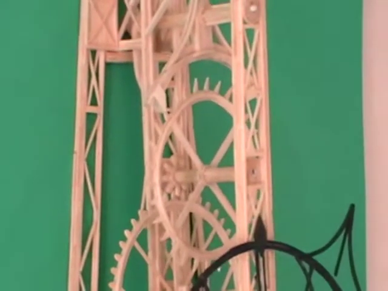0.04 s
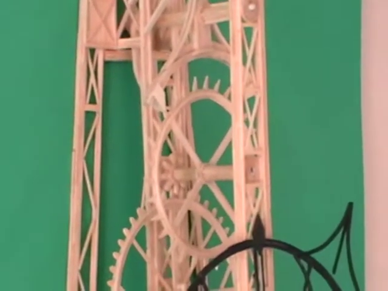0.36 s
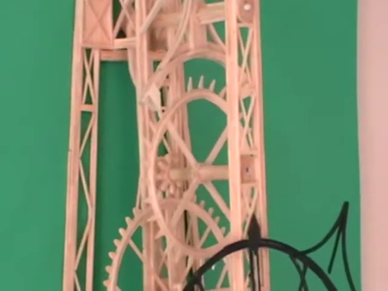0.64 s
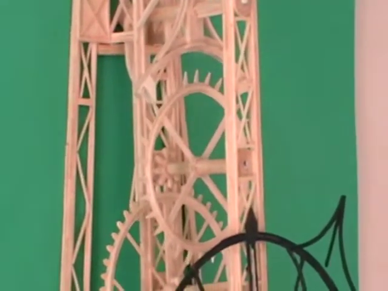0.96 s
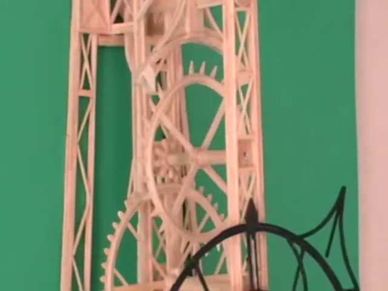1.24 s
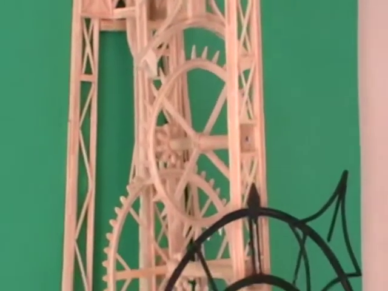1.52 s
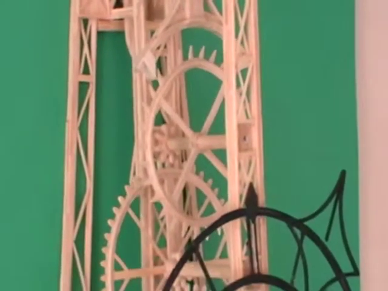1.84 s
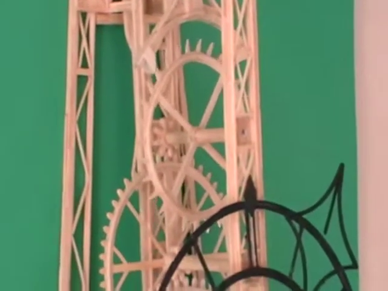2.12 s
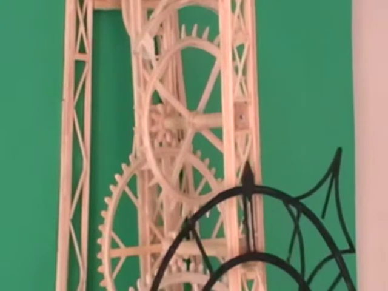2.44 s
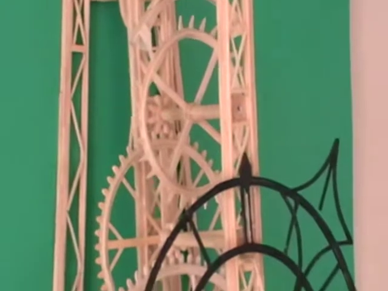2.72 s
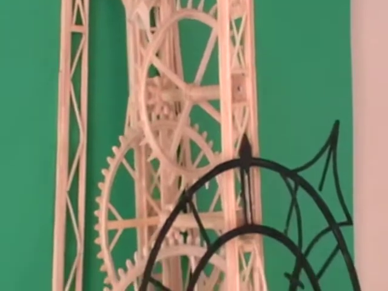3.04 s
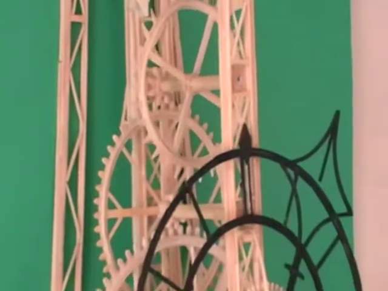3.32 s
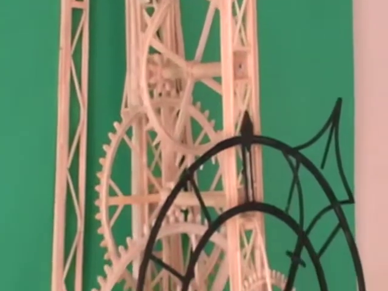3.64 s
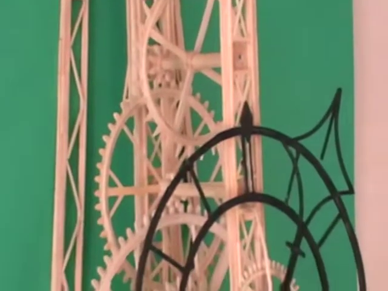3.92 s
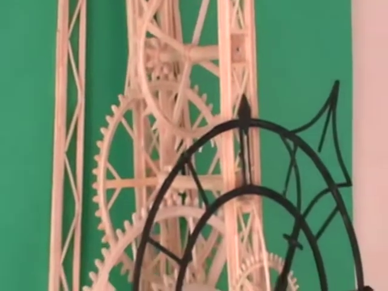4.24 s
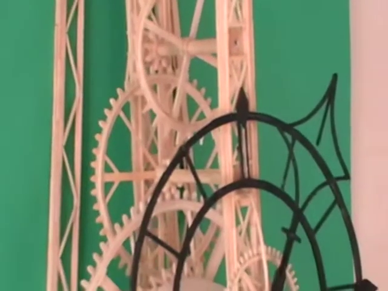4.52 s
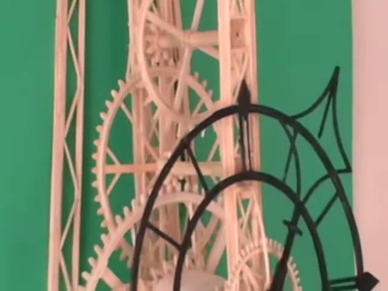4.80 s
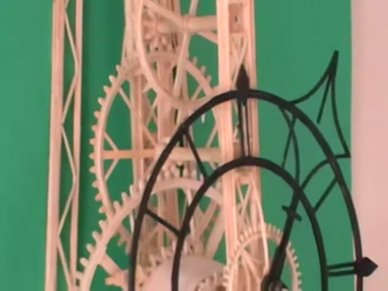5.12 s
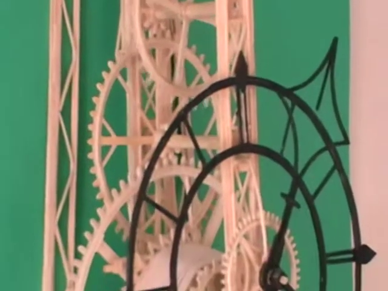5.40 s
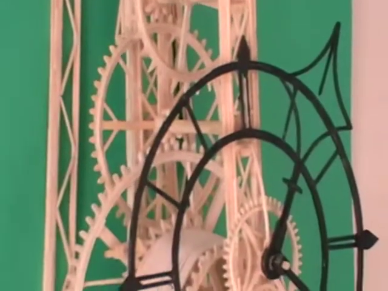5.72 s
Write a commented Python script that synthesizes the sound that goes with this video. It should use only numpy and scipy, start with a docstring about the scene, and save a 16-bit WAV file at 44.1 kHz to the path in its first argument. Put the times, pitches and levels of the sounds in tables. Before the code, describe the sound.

A wooden clock mechanism clicks about once a second among irregular gear ticks, then briefly clatters and thuds.

```python
"""The gear train of a tall wooden clock turns in fits and starts in a small, quiet room.
Teeth tick, drag and rub on each other while the escapement beats about once a second.
A slipping wheel shakes the frame and a catch snaps once. Near the end loose parts clatter
against the frame and a hollow part thuds. Each contact is a tiny impact and a chatter of
wood grain that ring the wheel and, briefly, the room, over soft air and a faint hum."""
import sys
import numpy as np
from scipy import signal
from scipy.fft import rfft, irfft, next_fast_len
from scipy.io import wavfile

SR = 44100
rng = np.random.default_rng(int(sys.argv[2]) if len(sys.argv) > 2 else 0)


def digitize_waveform(pressure):
    """Quantize a signal to 16-bit integers and store it at the path in sys.argv[1].

    Rows of a 2-D input are taken as channels; values are limited to [-1, 1].
    """
    field = np.atleast_2d(pressure).T
    bounded = np.clip(field, -1, 1)
    quanta = np.round(bounded * 32767).astype(np.int16)
    wavfile.write(sys.argv[1], SR, quanta)


N = 258426
WHEEL_HZ = 2690   # where a wheel rings when a tooth seats or falls back

# Teeth that meet cleanly. Each row: start in seconds, level in dB, resonance in Hz,
# hardness in dB per octave of treble, weight in dB per octave of bass.
TOOTH_TICKS = [(0.0455, -5, 1530, 0, -0.5), (0.2901, -18, 1750, -2.5, 3.5), (0.86, -16.5, 1740, -3.5, 1.5),
               (1.4907, -23, 1760, -7.5, -4), (2.8149, -12.5, 4500, 3.5, 4), (2.9481, -9.5, 2200, 0, -0.5),
               (3.014, -9, 3730, 0.5, -3), (3.0928, -19.5, 4130, 1.8, -1.5), (3.1632, -21.5, 2050, -3, 2),
               (4.0855, -21, 2700, -6, -3)]
# Teeth that drag before they seat. Each row: start in seconds, level in dB, resonance in Hz,
# slide time in seconds, hardness in dB per octave of treble.
TOOTH_DRAGS = [(0.1905, -12.5, 1600, 0.031, -0.5), (0.386, -11, 1330, 0.017, 0.9),
               (0.519, -18, 1370, 0.026, -2.5), (0.7764, -27, 1370, 0.022, -0.5),
               (0.8873, -14, 1570, 0.012, 1), (1.023, -21.5, 2160, 0.0073, -2.5),
               (1.2599, -21.5, 1660, 0.026, 2.5), (1.3644, -20.5, 1750, 0.02, 1),
               (1.9156, -18.5, 1700, 0.01, 7), (1.9448, -13.5, 715, 0.021, -5),
               (2.139, -26.5, 1560, 0.038, 1), (2.2814, -34, 2500, 0.0089, 2.5),
               (3.4749, -17.5, 2880, 0.0067, -8.5), (3.512, -15.5, 1180, 0.02, -20),
               (3.5234, -5, 2660, 0.014, 0.3), (4.0036, -27, 1360, 0.005, -0.5),
               (4.2085, -18, 2980, 0.0067, -0.3), (4.7366, -18, 870, 0.0093, -2)]


def ticks(chatter_s=0.0028, halving_db=6):
    """Teeth meet with a sharp first impact; the harder the contact, the shorter its chatter."""
    # The tone of a tick. Each row: frequency in Hz, gain in dB.
    tone = [(270, -3.5), (870, -3.5), (1600, 1), (2450, -2.5), (4700, -3), (6800, -7.5), (13500, -15)]
    touches = [(s, db, hz, chatter_s * 2 ** (-hardness / halving_db), hardness, weight)
               for s, db, hz, hardness, weight in TOOTH_TICKS]
    return from_db(7) * strike(touches, tone, lift_db=7.5, q=10, impact_db=-6.5,
                               wheel_s=0.01, room_db=0, rise_share=0.48, ripple_db=4.5)


def drags(seat_after_s=0.02, seat_db=-10.5, seat_chatter_s=0.012):
    """Teeth slide over each other, then seat with a weaker touch that rings the wheel."""
    # The tone of a drag. Each row: frequency in Hz, gain in dB.
    tone = [(270, -2), (870, -4.5), (1600, 1.5), (2450, -0.7), (4500, -5.5), (6800, -10.5), (13500, -21.5)]
    slides = [(*drag, 0) for drag in TOOTH_DRAGS]
    seats = [(s + seat_after_s, db + seat_db, WHEEL_HZ, seat_chatter_s, hardness, 0)
             for s, db, _, _, hardness in TOOTH_DRAGS]
    return from_db(8) * strike(slides + seats, tone, lift_db=9.5, q=6, impact_db=-13,
                               wheel_s=0.011, room_db=-2, rise_share=0.14, ripple_db=2)


def escapement(rebound_s=0.029, rebound_db=-26):
    """Two pallets catch the escape wheel in turn; after each crisp beat it falls back softly."""
    # The start of each beat in seconds.
    beat_times = [0.0202, 1.1548, 2.1922, 3.3228, 4.3465, 5.4603]
    # Tick and tock. Each row: level in dB, resonance in Hz, chatter in seconds,
    # hardness and weight in dB per octave.
    pallets = [(-16.5, 2540, 0.0016, 0.2, -0.5), (-11, 2400, 0.0031, -0.3, 1.5)]
    # The tone of a beat. Each row: frequency in Hz, gain in dB.
    tone = [(270, -11.5), (950, -0.5), (1600, 3), (2450, -1.5), (6800, -9.5), (10000, -6.5), (13500, -5.5)]
    beats = [(s, *pallets[k % 2]) for k, s in enumerate(beat_times)]
    rebounds = [(s + rebound_s, rebound_db, WHEEL_HZ, 0.003, -2, 1.5) for s in beat_times]
    return from_db(7) * strike(beats + rebounds, tone, lift_db=8.5, q=9.3, impact_db=-5.5,
                               wheel_s=0.013, room_db=-1, rise_share=0.69, ripple_db=2)


def catch(chatter_s=0.0031):
    """The catch snaps in, rebounds and rings brightly."""
    # The snap. Each row: start in seconds, level in dB, resonance in Hz.
    snaps = [(3.727, -1, 3280)]
    # Its tone. Each row: frequency in Hz, gain in dB.
    tone = [(270, -10.5), (870, -9), (1500, -7.5), (2450, 2.5), (4700, -4), (6800, -9.5), (13500, -4.5)]
    # Resonances of the catch. Each row: centre in Hz, width in Hz, gain in dB.
    resonances = [(3300, 220, 5.5), (4630, 640, 5.5), (9160, 1050, 12.5)]
    touches = double_touch(snaps, chatter_s, gap_s=0.0125, change_db=-7)
    snap = strike(touches, tone, lift_db=4.5, q=8, impact_db=-21,
                  wheel_s=0.0096, room_db=-3, rise_share=0.18, ripple_db=5.5)
    return from_db(6.5) * shape(snap, resonances)


def clatter(chatter_s=0.0058, rattle_start_s=4.9414, rattle_gap_s=0.031, rattle_hz=1160):
    """Loose parts knock on the frame, then rattle in three softer, nearly equal bounces."""
    # The knocks. Each row: start in seconds, level in dB, resonance in Hz, weight in dB per octave.
    knocks = [(4.8126, 3.5, 1190, -1), (4.8288, 0.7, 925, 2.5), (4.8378, -1.5, 1030, 3.5),
              (4.8652, 2, 1030, -1.1), (4.8744, -2.5, 1340, 2.8)]
    # Their tone. Each row: frequency in Hz, gain in dB.
    tone = [(270, 3.5), (950, 5), (1700, 1), (2450, -1.5), (4700, -2), (6800, -7.5), (13500, -9.5)]
    blows = [(s, db, hz, chatter_s, 0, weight) for s, db, hz, weight in knocks]
    bounces = [(rattle_start_s + k * rattle_gap_s, -12 + 0.26 * k, rattle_hz, 0.012, -2, -1)
               for k in range(3)]
    return from_db(6.5) * strike(blows + bounces, tone, lift_db=8, q=5.6, impact_db=-22,
                                 wheel_s=0.0069, room_db=-1, rise_share=0.25, ripple_db=2)


def thud(chatter_s=0.0064):
    """A quick double blow lands on a hollow part of the frame."""
    # The blow. Each row: start in seconds, level in dB, resonance in Hz.
    thuds = [(5.1768, -3.5, 880)]
    # Its tone. Each row: frequency in Hz, gain in dB.
    tone = [(270, 9.5), (870, 2), (1400, 3), (2450, 1), (6800, -3), (13500, -11.5)]
    # Peaks and dips of the hollow part. Each row: centre in Hz, width in Hz, gain in dB.
    hollow = [(328, 40, 4), (565, 69, 7.5), (682, 110, -19), (835, 120, 9.5), (1130, 250, -4.5),
              (1730, 280, 2), (2034, 300, -17)]
    touches = double_touch(thuds, chatter_s, gap_s=0.008, change_db=1)
    blow = strike(touches, tone, lift_db=8.5, q=6.5, impact_db=-23,
                  wheel_s=0.0068, room_db=0, rise_share=0.14, ripple_db=0.5)
    return from_db(6.5) * shape(blow, hollow)


def shudder(slip_start_s=1.93, slip_gap_s=0.0172, slip_db=-33, edge_db=-6.5, room_db=-10):
    """A wheel sticking and slipping, and later three jolts, kick the frame's low bending modes."""
    # The jolts. Each row: start in seconds, level in dB.
    jolts = [(4.889, -28.5), (5.177, -43), (5.463, -45)]
    # Well damped bending modes. Each row: frequency in Hz, level in dB, t60 in seconds.
    bending = [(200, -13, 0.079), (248, 7, 0.067), (298, -8, 0.046), (490, -5, 0.084)]
    slips = [(slip_start_s + k * slip_gap_s, slip_db + edge_db * place ** 2)
             for k, place in enumerate(np.linspace(-1, 1, 5))]   # loudest in the middle
    kicks = np.zeros(N)
    for s, db in slips + jolts:
        kicks[round(s * SR)] = from_db(db)
    swing = signal.fftconvolve(kicks, ring(bending, SR // 4))[:N]
    return swing + from_db(room_db) * signal.fftconvolve(swing, room_tail(build_s=0.003)[0])[:N]


def rubbing(grains_per_s=1600, level_db=-57.5, fade_s=0.079, follow=0.76):
    """Wood fibres catch and let go as the wheels turn for a moment around each tooth contact."""
    # The tone of the rubbing. Each row: frequency in Hz, gain in dB.
    tone = [(300, -36), (900, 8), (2200, 0.5), (4500, 2.5), (9000, -7.5), (14000, -53)]
    t = np.arange(N) / SR
    power = sum(from_db(follow * db) ** 2 * np.exp(-np.abs(t - s) / fade_s)
                for s, db, *_ in TOOTH_TICKS + TOOTH_DRAGS)
    return from_db(level_db) * np.sqrt(power * N) * unit(colour(grains(N, grains_per_s), tone))


def double_touch(blows, chatter_s, gap_s, change_db):
    """Each blow lands twice on the same part."""
    return [(s + k * gap_s, db + k * change_db, hz, chatter_s, 0, 0)
            for s, db, hz in blows for k in (0, 1)]


def strike(touches, tone, lift_db, q, ripple_db, pivot_hz=2500, **contact_settings):
    """Wood touches wood, each time with its own tilt and resonances; gives mid and side."""
    track = np.zeros((2, N))
    knots = np.geomspace(tone[0][0], tone[-1][0], 48)
    octaves = np.log2(knots / pivot_hz)
    for s, db, ring_hz, chatter_s, hardness, weight in touches:
        tilt = np.where(octaves > 0, hardness, -weight) * octaves
        # the place of contact favours some modes of the wheel and misses others
        ripple = ripple_db * np.diff(rng.standard_normal(len(knots) + 1)) / np.sqrt(2)
        curve = np.c_[knots, at_hz(tone, knots) + tilt + ripple]
        hit = colour(contact(chatter_s, **contact_settings), curve)
        hit = shape(hit, [(ring_hz, ring_hz / q, lift_db)])
        start = round(s * SR)
        track[:, start:start + hit.shape[1]] += from_db(db) * hit[:, :N - start]
    return track


def contact(chatter_s, impact_db, wheel_s, room_db, rise_share):
    """One touch as mid and side: first impact, chatter of the grain, dense wheel ring, room."""
    tail = room_tail(build_s=chatter_s + 0.0027)
    t = np.arange(tail.shape[1]) / SR
    rise = 1 - np.exp(-(t + 1 / SR) / (rise_share * chatter_s))
    chatter = unit(grains(len(t), per_s=2500) * rise * np.exp(-t / chatter_s))
    wheel_envelope = unit(rise * np.exp(-(t / (wheel_s + chatter_s)) ** 2))
    wheel = rng.standard_normal(tail.shape) * wheel_envelope
    wheel = colour(wheel, [(5000, 0), (9000, 2.5), (14000, -9)])   # wood damps the top treble
    sound = 0.8 * wheel + from_db(room_db) * tail
    sound[0] += disperse(from_db(impact_db) * (t == 0) + 0.46 * chatter)
    return sound / np.sqrt(np.sum(sound[0] ** 2))


def disperse(x, delay_s=0.000569, reference_hz=3000):
    """Bending waves in wood carry the treble faster than the bass, which smears a sharp impact."""
    phase = 4 * np.pi * delay_s * np.sqrt(reference_hz * bins(len(x)))
    return irfft(rfft(x) * np.exp(-1j * phase), len(x))


def frame(blows, ring_db=-18):
    """The struck frame colours each blow and rings on with its own modes."""
    # Broad peaks and dips of the frame. Each row: centre in Hz, width in Hz, gain in dB.
    body = [(304, 51, 2.5), (465, 84, -2.5), (907, 330, -7.5), (2660, 590, 4.5)]
    # Its ringing modes. Each row: frequency in Hz, level in dB, t60 in seconds.
    modes = [(156.2, 7.5, 0.72), (234, 4, 0.66), (453, -9, 0.95), (610, -9, 0.79), (658, 11, 0.25),
             (690, -8, 0.32), (790, -6, 0.083), (982, -1, 0.15), (1100, -2, 0.37), (1220, -16, 0.16),
             (1670, -12, 0.36), (1750, 16, 0.1), (2160, -8, 0.64), (2680, 5.5, 0.37), (2850, 0, 0.29)]
    return resonate(shape(blows, body), ring(modes, SR // 2), ring_db)


def lattice(x, t60_s=0.05, ring_db=-6):
    """The many close modes of the lattice of struts add a short, dense ring."""
    t = np.arange(SR // 4) / SR
    response = rng.standard_normal(len(t)) * np.exp(-np.log(1000) * t / t60_s)
    return resonate(x, response, ring_db)


def radiate(mid_side):
    """Thin wooden parts radiate little bass; the stereo image is narrow except in the top treble."""
    # How the wood radiates. Each row: frequency in Hz, gain in dB.
    wood = [(60, -41), (120, -15.5), (170, -8.5), (230, -5.5), (450, -4.5), (700, -1), (1100, 0.5),
            (1800, -1.5), (2900, 0), (4500, 1), (6500, 0), (9300, -3), (11500, -10), (16000, -21)]
    # Width of the contacts. Each row: frequency in Hz, side against mid in dB.
    width = [(120, -38), (500, -17), (4000, -13.5), (9000, -19.5), (13000, 2.5)]
    return stereo(colour(mid_side, wood), width)


def room_tail(build_s, size=20480, bands=7):
    """Dense reflections, new for each place of contact, build up and die band by band."""
    # The room's decay. Each row: frequency in Hz, t60 in seconds.
    decay = [(200, 1), (450, 0.074), (1000, 0.36), (3000, 0.24), (7000, 0.24), (14000, 0.16)]
    t, tail = np.arange(size) / SR, 0
    spectrum = rfft(rng.standard_normal((2, size)))
    centres = np.geomspace(200, 13000, bands)
    for hz, weights in zip(centres, np.eye(bands)):
        band = irfft(spectrum * at_hz(np.c_[centres, weights], bins(size)))
        envelope = unit(np.exp(-np.log(1000) * t / at_hz(decay, hz)) * (1 - np.exp(-t / build_s)))
        tail += from_db(-2 * hz / 8000) * band * envelope   # the walls swallow some treble
    return tail


def room_tone(air_db=-55.6):
    """Soft, wide air noise lies under a slightly wavering hum."""
    # The tone of the air. Each row: frequency in Hz, gain in dB.
    air_tone = [(15, -63), (25, -51), (50, -17.5), (87, -13.5), (157, -8), (236, -11.5), (405, -11.5),
                (451, -9.5), (754, -17.5), (962, -22.5), (1040, -20), (1330, -21.5), (1790, -27),
                (16000, -44.5)]
    # Its width. Each row: frequency in Hz, side against mid in dB.
    air_width = [(30, -2), (120, -13), (500, -8), (2000, 0.5), (6000, -3.5), (14000, -6)]
    # The hum. Each row: frequency in Hz, rms level in dB.
    hum_tones = [(100, -64), (162, -61.5), (299, -66.5)]
    noise = stereo(rng.standard_normal((2, N)), air_width)
    air = unit(colour(noise, air_tone)) * np.sqrt(2 * N)
    t, hum = np.arange(N) / SR, 0
    for hz, db in hum_tones:
        waver_s = 0.00325 * np.cumsum(rng.standard_normal(N)) / np.sqrt(SR)
        hum += np.sqrt(2) * from_db(db) * np.sin(2 * np.pi * hz * (t + waver_s))
    return from_db(air_db) * air + hum


def grains(size, per_s):
    """Micro-impacts of random strength at random times."""
    return rng.standard_normal(size) * (rng.random(size) < per_s / SR)


def ring(modes, size):
    """Struck modes die away as decaying sines."""
    t = np.arange(size) / SR
    hz, db, t60 = np.transpose(modes)[:, :, None]
    return np.sum(from_db(db - 60 * t / t60) * np.sin(2 * np.pi * hz * t), axis=0)


def resonate(x, response, ring_db):
    """Add a part's ring to the sound that excites it."""
    return x + from_db(ring_db) * signal.fftconvolve(x, unit(response)[None], axes=1)[:, :N]


def shape(x, resonances):
    """Each resonance lifts or dips one region of the spectrum."""
    for hz, width_hz, db in resonances:
        b, a = signal.iirpeak(hz, hz / width_hz, fs=SR)
        x = x + (from_db(db) - 1) * signal.lfilter(b, a, x)
    return x


def colour(x, curve):
    """Minimum-phase EQ along a (Hz, dB) curve, so nothing rings ahead of an attack."""
    size = 2 * next_fast_len(x.shape[-1])
    cepstrum = irfft(np.log(from_db(at_hz(curve, bins(size)))))
    cepstrum[1:size // 2] *= 2
    cepstrum[size // 2 + 1:] = 0
    return irfft(rfft(x, size) * np.exp(rfft(cepstrum)))[..., :x.shape[-1]]


def stereo(mid_side, width):
    """Mid and side become left and right, with the side following a width curve."""
    return mid_side[0] + colour(mid_side[1], width) * [[1], [-1]]


def at_hz(points, hz):
    """Read a curve on a log-frequency axis."""
    knots, values = np.transpose(points)
    return np.interp(np.log(np.maximum(hz, 1)), np.log(knots), values)


def bins(size):
    """Frequencies of a real spectrum."""
    return np.arange(size // 2 + 1) * SR / size


def unit(x):
    """Scale to an energy of one."""
    return x / np.sqrt(np.sum(x ** 2) + 1e-20)


def from_db(db):
    """Decibels to gain."""
    return 10 ** (np.asarray(db) / 20)


def scene():
    """All the contacts sound from the same wooden works, a touch right of centre, over room tone."""
    knocks = frame(clatter() + thud())
    contacts = lattice(escapement() + ticks() + drags() + catch() + knocks)
    works = radiate(contacts) + shudder() + rubbing()
    # the open frame is too slender to radiate deep bass
    works = signal.sosfilt(signal.butter(4, 140, "high", fs=SR, output="sos"), works)
    return works * from_db([[-.3], [.3]]) + room_tone()


def record(dry):
    """A steep low-pass cuts the top above 16 kHz."""
    return signal.sosfilt(signal.ellip(10, .2, 70, 16000, fs=SR, output="sos"), dry)


dry = scene()
out = record(dry)
digitize_waveform(out)
```